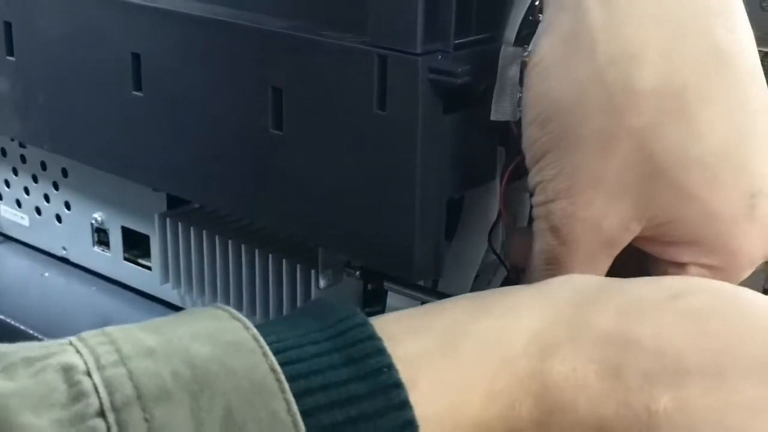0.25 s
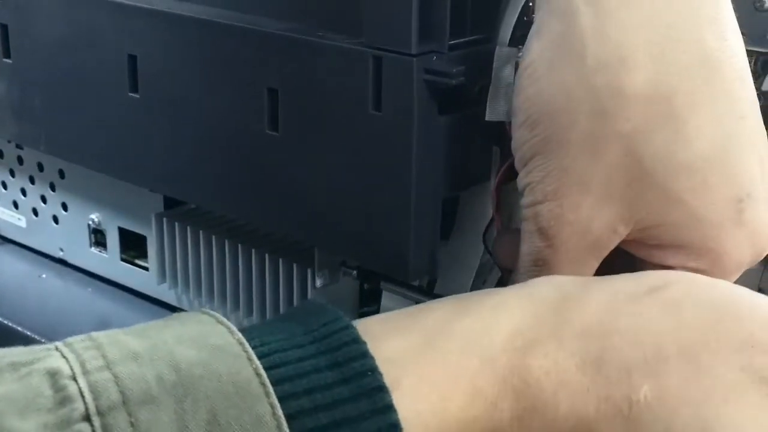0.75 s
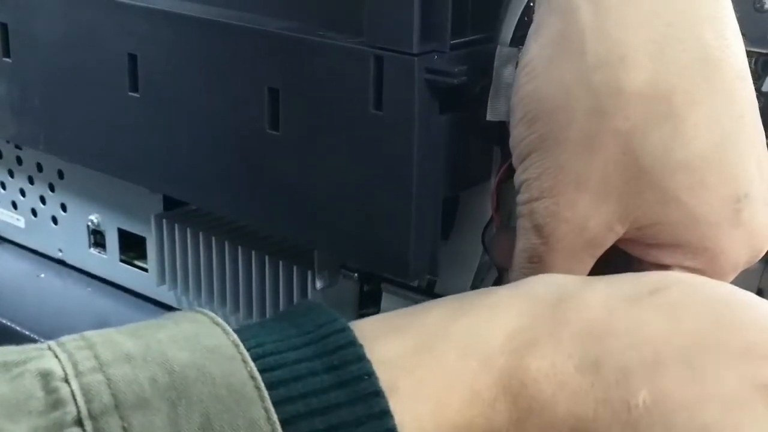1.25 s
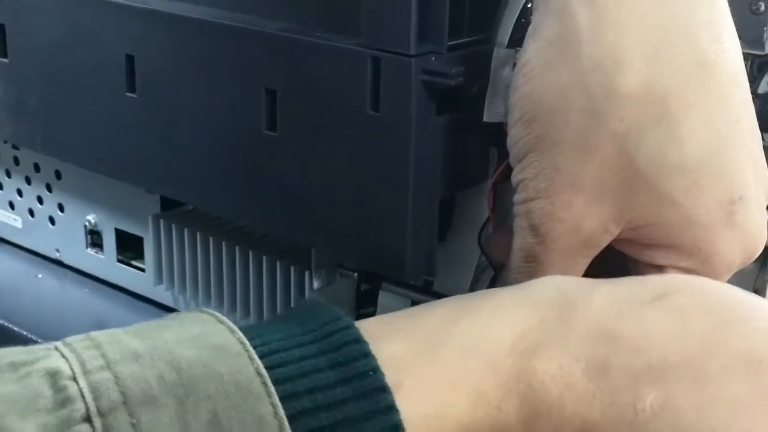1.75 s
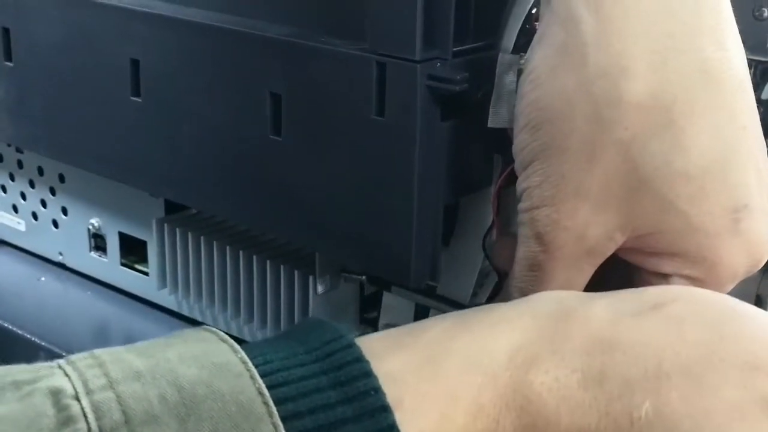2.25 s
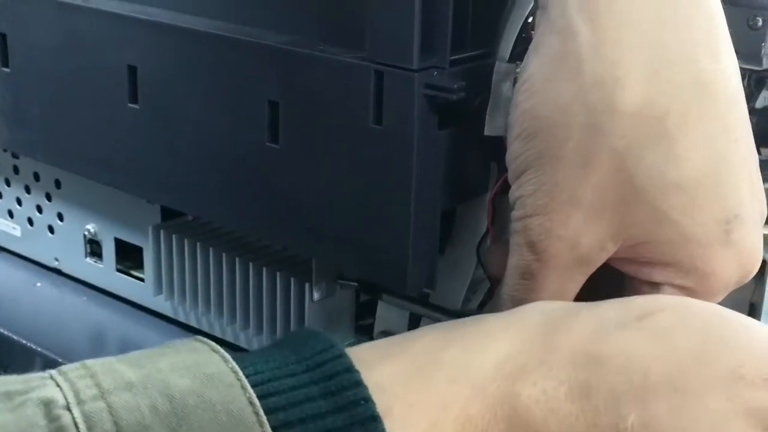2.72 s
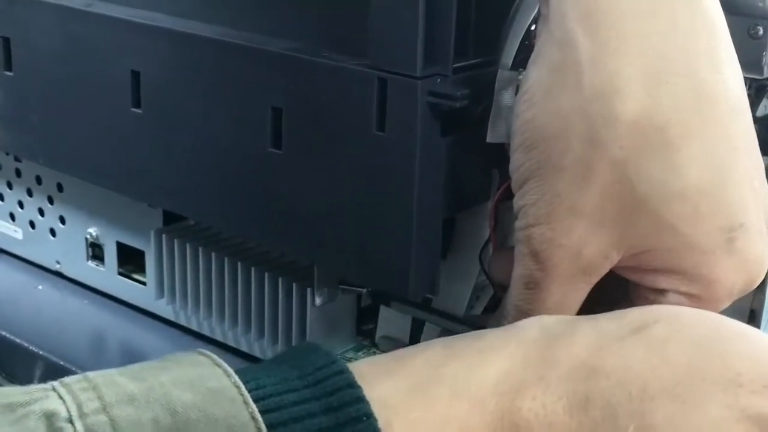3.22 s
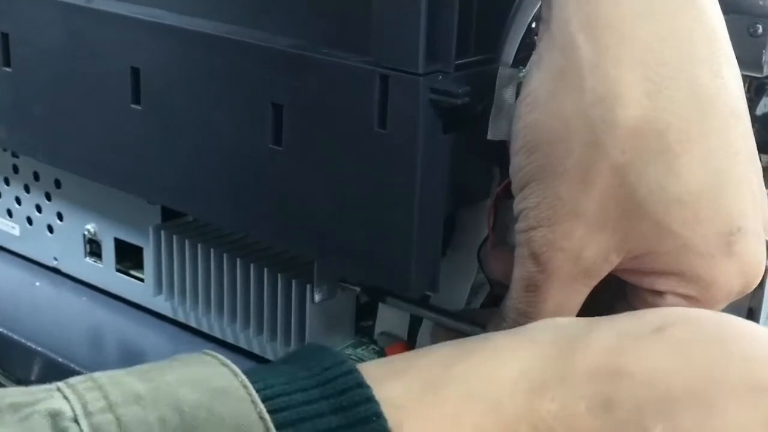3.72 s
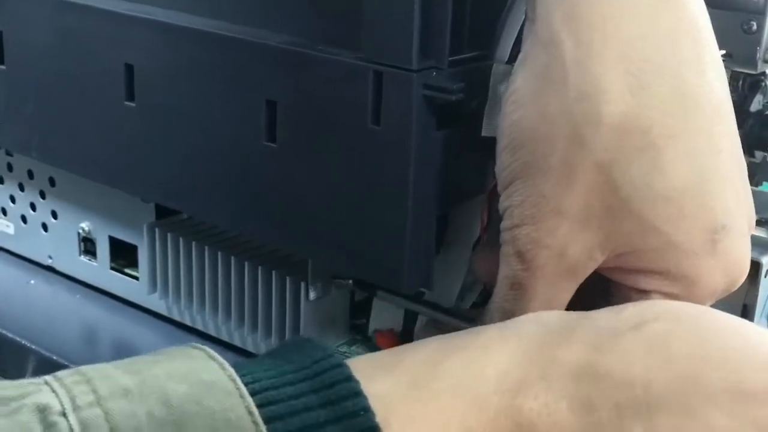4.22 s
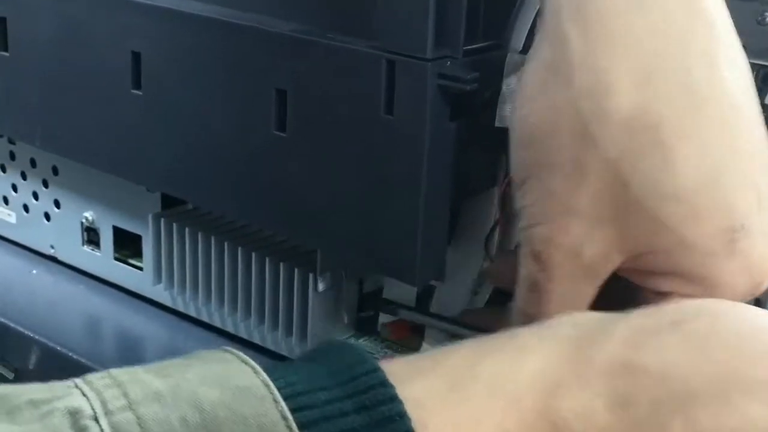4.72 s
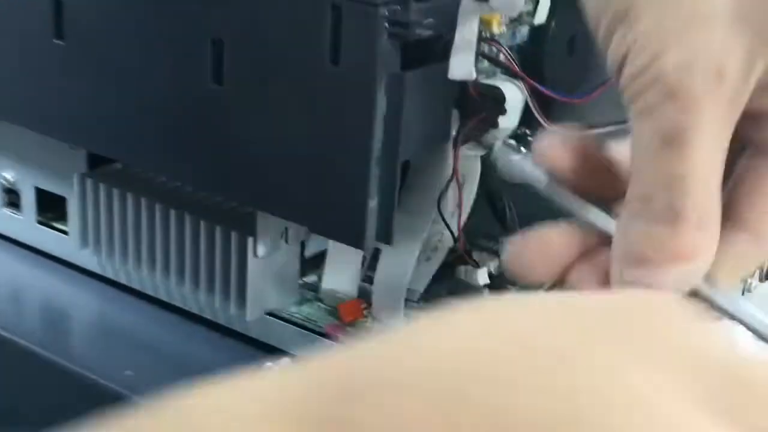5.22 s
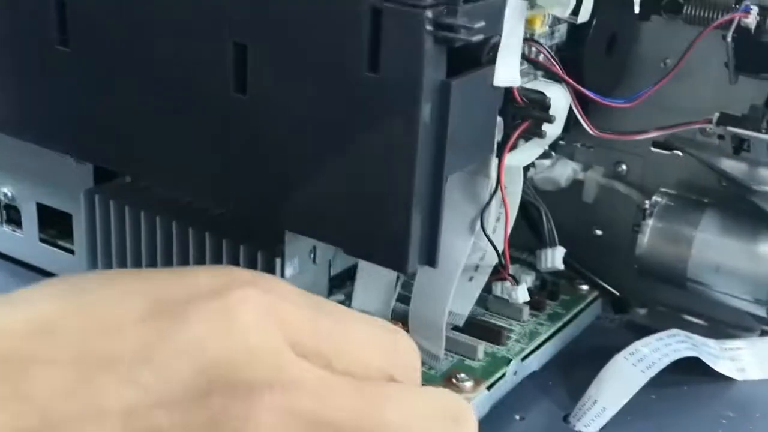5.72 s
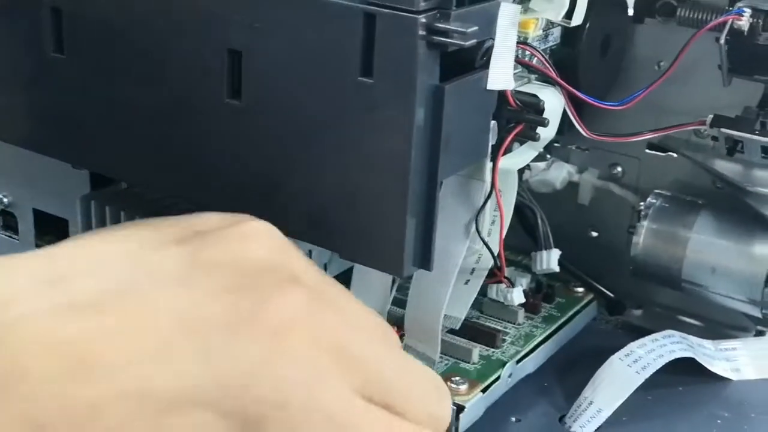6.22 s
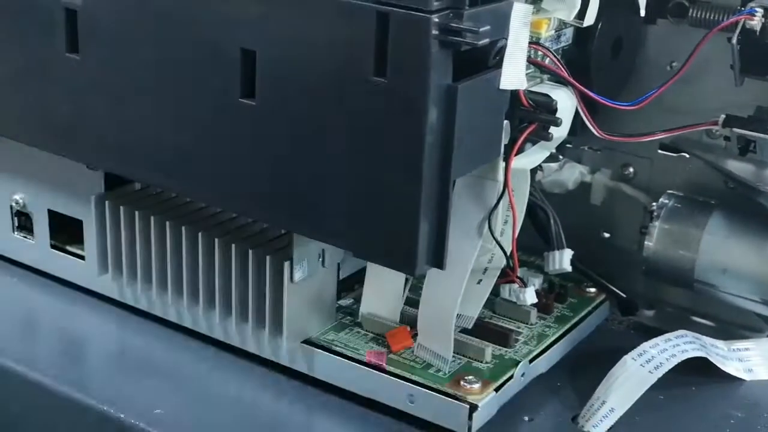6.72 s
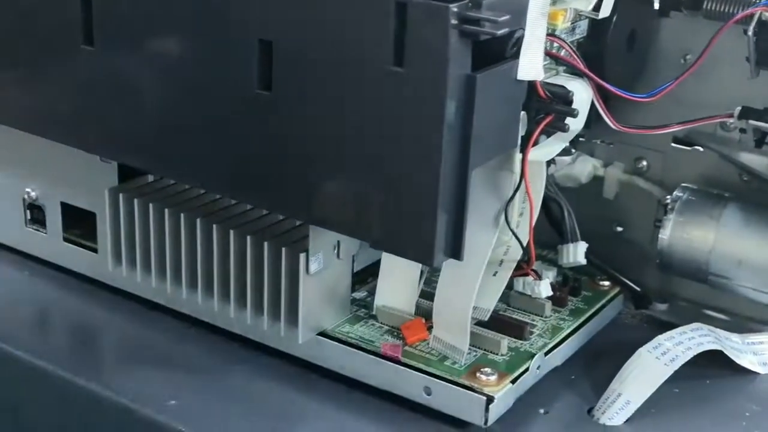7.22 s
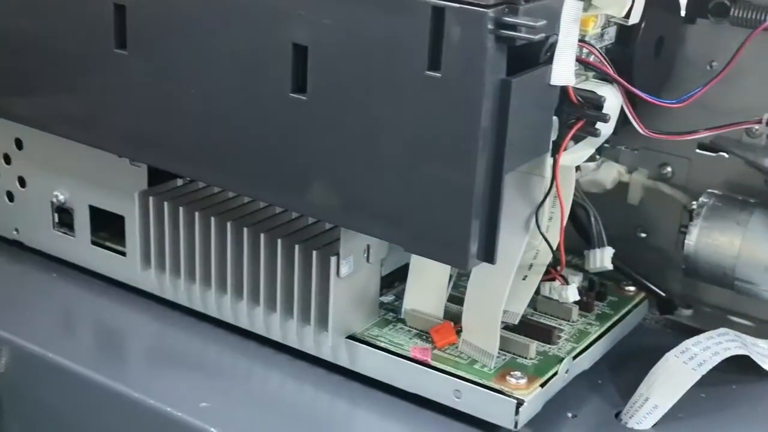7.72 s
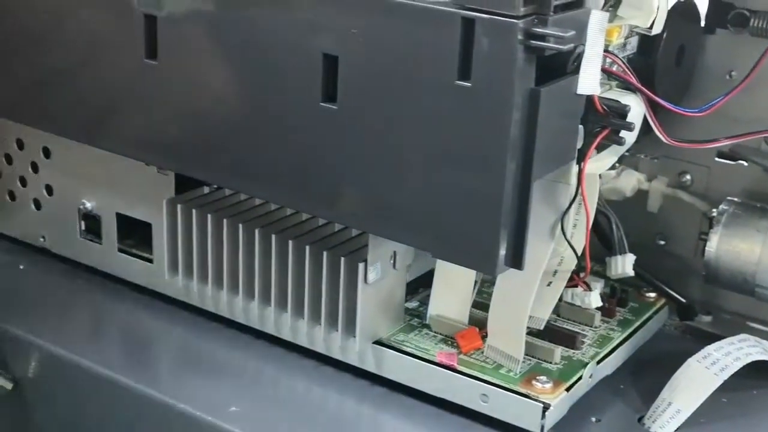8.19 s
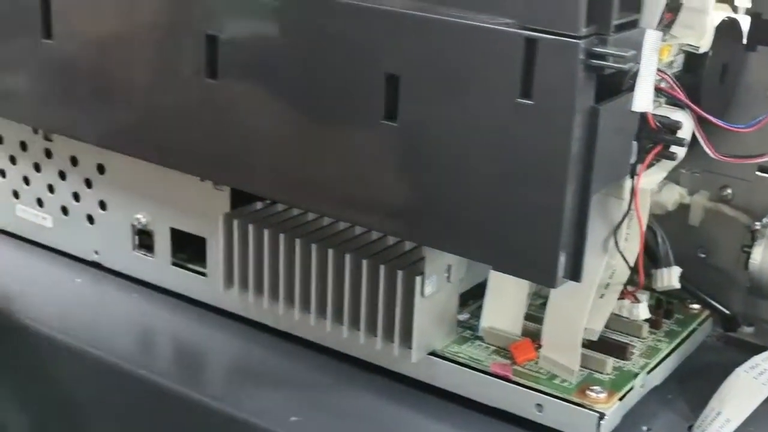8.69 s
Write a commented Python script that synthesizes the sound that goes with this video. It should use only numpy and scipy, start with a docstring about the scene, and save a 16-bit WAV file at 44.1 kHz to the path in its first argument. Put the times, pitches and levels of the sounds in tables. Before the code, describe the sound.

Light metal clicks and scrapes of a screwdriver inside an open printer, then a rattle and a ringing clang as it is put down.

```python
"""Light clicks and scrapes come first: a screwdriver works a screw out of an open printer, near a phone.
Each impact excites the modes of the steel chassis, and sliding friction drives them with tiny slips.
The bit rattles against the chassis as it is drawn out; then the tool is put down on a ringing sheet
with a clang, and a few knocks follow. The bench thuds and sleeves rustle, while faint hisses and
a brief whine sound over the quiet rumble of a small workshop."""
import sys
import numpy as np
from scipy import signal
from scipy.fft import rfft, irfft, next_fast_len
from scipy.io import wavfile

SR = 44100
rng = np.random.default_rng(int(sys.argv[2]) if len(sys.argv) > 2 else 0)


def generate_wav(signal):
    """Clip the signal to [-1, 1] and save it as 16-bit WAV at the path in sys.argv[1]."""
    frames = np.transpose(np.atleast_2d(signal))
    scaled = np.clip(frames, -1, 1) * 32767
    pcm = np.round(scaled).astype(np.int16)
    wavfile.write(sys.argv[1], SR, pcm)


N = 394694

# Levels are relative within each table; balance is left minus right. # metal striking the chassis, and from 8.3
# s the set-down tool knocking: start_s, level_db, knock_db, bright_db, panel_hz
IMPACTS = [(0.223, -54.5, 1.5, -20, 2100), (0.355, -49, -1, -18, 1600), (1.1095, -56, -1, -15, 1560),
           (1.6516, -60.5, -12, 2, 1870), (1.6822, -59, -26, -9, 2320), (1.708, -61, -14, 0.5, 2300),
           (1.7344, -55, -2, -4, 2580), (2.2418, -38, -7, -17, 1653), (2.3325, -50.5, -7, -13.5, 1640),
           (2.4548, -56.5, -6, 1, 2370), (2.5035, -49, -5.5, -13, 2580), (2.6774, -38.5, -11.5, -8, 2060),
           (2.7198, -42, -4.5, -21, 1745), (3.0605, -42, -23, -6.5, 2700), (3.22, -44, -11.5, -12.5, 2450),
           (3.4217, -55, -8, -2, 1690), (3.523, -44.5, -5.5, -13, 2620), (3.684, -34, -4.5, -3.5, 2750),
           (4.0964, -36, -6, -3, 2590), (4.129, -43.5, 2.5, -7, 2395), (4.303, -56.5, -9, 1, 2620),
           (4.363, -40.5, -4.5, -3.5, 1790), (4.384, -37.5, -2, -11.5, 2660),
           (4.7657, -32.5, -16, -16, 1867), (4.7872, -38.5, -20, -17.5, 2540),
           (4.8119, -40, -21.5, -5.5, 2400), (4.8458, -40.5, -8, -6.5, 2210), (4.921, -39, -22.5, -1, 2540),
           (4.9499, -22, -27, 0.5, 2700), (5.012, -27.5, -25.5, -4.5, 2860),
           (5.053, -26, -50.5, -2.5, 2700), (5.102, -18.5, -14.5, -1, 1870),
           (5.1485, -29.5, -14, 1.5, 1843), (5.176, -30, -26, -3.5, 2047), (5.2718, -22.5, -18, -4, 2655),
           (5.2839, -26.5, -0.5, -6, 2780), (5.37, -42, -13, -17, 2020), (5.4042, -41, -11, -10, 2050),
           (5.874, -50, -18, -7, 2650), (6.145, -42, -18, 0, 2290), (6.1541, -40, -12.5, -1.5, 2170),
           (7.428, -56, -4, -30, 2120), (7.7705, -42.5, -27, -12.5, 2470), (8.3473, -33, -9, -2, 2370),
           (8.4536, -33, -6, -29, 1680), (8.4843, -34, 3, -3.5, 1925), (8.603, -23, -15, -9.5, 1890),
           (8.6397, -32.5, -10, -25, 1700)]
# chassis and shaft resonances: pitch_hz, level_db
CHASSIS_MODES = [(830, -2), (1190, 2), (1600, -2), (1810, 2), (2280, 0.5), (2370, 3), (2530, 0.5),
                 (2650, 2), (2935, -1.5), (3900, 0.5), (4360, -2.5), (4635, -0.5), (5055, -15.5), (5870, 0),
                 (6440, -16), (6720, -13.5), (7480, 4.5), (7830, 2.5), (9640, 3.5)]
# spectrum of a contact: frequency_hz, density_db
CONTACT_SPECTRUM = [(100, -26), (300, -1), (520, -5), (800, 2), (1400, 2.5), (1800, -2.5), (2750, -4),
                    (3400, -1.5), (5500, -1.5), (7700, -3.5), (8700, -3.5), (10000, -4), (15000, -11.5)]
# leftward lean of a contact: frequency_hz, balance_db
CONTACT_BALANCE = [(300, 7), (1000, 7.5), (2500, -0.5), (4500, 5), (7500, 8.5), (13000, 7)]
# resonances of the sheet that the tool lands on: pitch_hz, level_db
SHEET_MODES = [(660, 4), (748, -6.5), (1061, 0), (1167, -28), (1260, -22), (1486, 13.5), (1566, -15),
               (1764, -19), (1810, -26), (2019, 10.5), (2165, -26), (2195, -14), (2506, 0), (2534, -11),
               (2592, -18), (2692, -5), (2879, -18), (2942, 12), (3246, -7), (3345, 0), (3670, -11)]
# broad spectrum of that sheet: frequency_hz, density_db
SHEET_SPECTRUM = [(100, -24), (200, -20), (350, -15.5), (480, -25), (650, -15), (900, -16.5), (1150, -12.5),
                  (1500, -7.5), (1850, -6.5), (2850, -3.5), (3300, -11), (5000, -26.5), (7800, -31),
                  (9500, -65)]
# its clusters of crowded modes: centre_hz, boost_db
SHEET_CLUSTERS = [(690, 4), (1160, 4.5), (1550, 4), (1810, 13), (2170, 14), (2580, 9), (2900, 9), (3250, 6),
                  (3640, 7.5)]
# its stereo image: frequency_hz, balance_db
SHEET_BALANCE = [(400, 4.5), (1800, -6.5), (7000, -5)]
# bit and fingers sliding: middle_s, sigma_s, level_db, bright_db, knock_db
STROKES = [(0.31, 0.053, -69, -23, 1.5), (0.74, 0.025, -65, -12.5, -4.5), (1.131, 0.033, -62.5, -17, -3),
           (1.493, 0.022, -68, -9, -8), (1.808, 0.045, -66.5, -7, -9.5), (2.161, 0.014, -62.5, -8, -15),
           (2.23, 0.014, -58.5, -7.5, -11), (3.052, 0.0082, -60, -9, -15), (3.499, 0.011, -59, -10, -19),
           (4.093, 0.0026, -55.5, -1, -12), (4.758, 0.0046, -53, -7, -9.5), (4.83, 0.046, -56.5, -10, -10),
           (4.986, 0.035, -49.5, -4, -17.5), (5.069, 0.027, -48, 0, -14), (5.169, 0.044, -50, 1, -7),
           (5.332, 0.047, -51.5, -9.5, -6.5), (5.898, 0.031, -62, -13, -13.5),
           (8.365, 0.011, -43, -7.5, -3), (8.451, 0.027, -51, -8.5, -0.5)]
# light touches that leave one steel part ringing: start_s, pitch_hz, level_db, t60_s
TOUCHES = [(2.679, 7700, -40, 0.024), (4.099, 4140, -33.5, 0.038), (4.846, 4115, -38.5, 0.044),
           (5.876, 4610, -66.5, 0.99), (6.153, 2895, -54.5, 0.5), (8.484, 5260, -21, 0.015),
           (8.604, 1777, -34, 0.31)]
# free vibration of the screwdriver's shaft: pitch_hz, level_db, t60_s
SHAFT_MODES = [(2535, -1, 0.3), (4530, -3.5, 0.25), (7040, 6, 0.065), (9560, -4.5, 0.086)]
# the shaft glancing off the chassis: start_s, level_db
SHAFT_GLANCES = [(4.9215, -39), (4.95, -35), (5.046, -33.5)]
# soft bumps on the bench: start_s, level_db, pitch_hz
BENCH_BUMPS = [(6.138, -45, 173), (7.594, -34.5, 206.5), (7.696, -45, 200), (8.449, -38.5, 207),
               (8.486, -44, 330), (8.531, -45, 218)]
# arms shifting on the bench: middle_s, sigma_s, level_db
ARM_MOVES = [(4.25, 0.3, -67), (5.11, 0.24, -56), (8.03, 0.051, -50), (8.456, 0.094, -52)]
# rustle of the sleeves: frequency_hz, density_db
SLEEVE_SPECTRUM = [(30, -30), (80, 5), (130, 1.5), (220, -1), (330, -12), (600, -21), (1500, -48.5)]
# swells of thin hiss: peak_s, fall_s, level_db
HISS_SWELLS = [(3.74, 0.14, -60), (6.599, 0.052, -53), (7.36, 0.032, -56.5)]
# their spectrum: frequency_hz, density_db
HISS_SPECTRUM = [(3000, -6.5), (4800, -5.0), (5500, -1.0), (5900, 2), (6800, -0.5), (7800, 0.5),
                 (9000, -25.5), (14000, -29)]
# reverberation of the workshop: frequency_hz, t60_s
ROOM_DECAY = [(200, 1), (800, 0.12), (2200, 0.42), (6000, 0.34), (14000, 0.13)]
# spectrum of the room noise: frequency_hz, density_db
NOISE_SPECTRUM = [(12, -32), (20, -6.5), (43, 2.5), (114, -5.5), (239, -14), (346, -21.5), (528, -26),
                  (785, -27), (872, -23.5), (1370, -26.5), (1730, -20.5), (3020, -25), (4480, -35.5),
                  (7400, -34.5), (11000, -60.5), (14300, -91), (22000, -120)]
# its slow drift: time_s, level_db
NOISE_LEVEL = [(0, -55.5), (3, -57.5), (4.5, -56.5), (8.95, -54.5)]
# its likeness at the two microphones: frequency_hz, coherence
NOISE_COHERENCE = [(60, 0.9), (150, 0.93), (380, 0.74), (950, 0.29), (2380, 0.15), (5980, 0.1964),
                   (15000, 0.05)]
# its rightward lean: frequency_hz, balance_db
NOISE_BALANCE = [(200, -0.5), (1200, -1), (2400, -11.5), (4400, -0.5), (8000, -3.5)]

CRACK_T60_S, RING_T60_S = 0.0078, 0.067
RING_AT_DB, RING_HALVING_DB = -38, 56  # harder contacts are pressed on longer and ring shorter
SOFT_HZ, HARD_HZ, HARD_ABOVE_DB = 4280, 7520, -3.5  # bright contacts favour the higher shaft resonance
FIZZ_DB, FIZZ_PER_BRIGHT = -12, 2.3  # the top octave grows faster than the treble as contacts harden
PAN_DB, PAN_PER_BRIGHT = -7, 0.12  # dull contacts lie further right
LANDING_S, LANDING_DB, STAGGER_S, LANDING_THUD_DB = 7.9483, -6.5, 0.003, -39
CHATTER_AFTER_S, CHATTER_GAP_S, CHATTER_DB, CHATTER_LOSS_DB = 0.032, 0.021, -12, 7
SLIPS_PER_S, SLIPS_AT_DB, DOUBLING_DB = 900, -61.5, 9  # firmer sliding slips more often
THUD_DB, THUD_PER_DB, THUD_PER_KNOCK = -32.5, 0.6, 0.066  # how hard an impact pushes the bench
BENCH_HZ, BENCH_SPREAD, BENCH_T60_S = 178.7, 0.15, 0.095  # the pitch varies with the spot pushed
SQUEAL_S, SQUEAL_FALL_S, SQUEAL_DB, SQUEAL_HZ = 3.6, 0.1, -63.5, 5970
WHINE_S, WHINE_HZ, WHINE_DB, WHINE_RISE_S, WHINE_T60_S = 6.925, 536, -63, 0.02, 0.82
WAVER_HZ, WAVERS_PER_S = 17, 9.1
NOISE_LAG_S = 0.000598  # the room noise reaches the left microphone later
BAND_LIMIT_HZ = 15700


def chassis_clicks():
    """Impact excitation: a crack, then ringing steel; the spot struck favours two resonances."""
    out, t = np.zeros((2, N)), np.arange(SR // 3) / SR
    spreading = 1 - np.exp(-t / 0.0024)
    for s, db, knock_db, bright_db, panel_hz in IMPACTS:
        shaft_hz = HARD_HZ if bright_db > HARD_ABOVE_DB else SOFT_HZ
        loading = 1 + 0.015 * rng.standard_normal()  # the tool's pressure detunes the steel a little
        modes = [(hz * loading, level) for hz, level in CHASSIS_MODES + [(panel_hz, -1), (shaft_hz, 0)]]
        t60 = RING_T60_S * 2 ** ((RING_AT_DB - db) / RING_HALVING_DB)
        steel = amp(-4.5) * ring(modes, t, 1.2 * t60, spread_db=3.5)
        crack = amp(7.0) * burst(t, CRACK_T60_S)
        hit = unit_energy((crack + burst(t, t60) + steel) * spreading)
        favoured = lambda hz: 5 * hump(hz, panel_hz, width=0.12) + 5 * hump(hz, shaft_hz, width=0.08)
        click = chassis_colour(coloured(hit, favoured), knock_db, bright_db)
        add(out, s - 0.0007, amp(db + 32) * in_room(click, wet_db=-11))
    return out


def chassis_colour(x, knock_db, bright_db):
    """Contact stiffness sets bandwidth: heavy contacts move the panels, hard ones reach the treble."""
    fizz_db = FIZZ_DB + FIZZ_PER_BRIGHT * bright_db
    pan_db = PAN_DB + PAN_PER_BRIGHT * bright_db
    hardness = [(1100, knock_db), (1700, 0.0017), (2900, 0.019),
                (3600, bright_db), (7900, bright_db), (9500, fizz_db)]
    balance = lambda hz: panned(pan_db + along(CONTACT_BALANCE, hz))
    return coloured(x, lambda hz: along(CONTACT_SPECTRUM, hz) + along(hardness, hz) + balance(hz))


def sheet_clang():
    """Plate vibration: the tool lands in quick blows on a sheet whose dense modes ring, then settle."""
    out, t = np.zeros((2, N)), np.arange(SR * 3 // 4) / SR
    clusters = lambda hz: sum(db * np.exp(-((hz - centre) / 90) ** 2) for centre, db in SHEET_CLUSTERS)
    sheet = lambda hz: along(SHEET_SPECTRUM, hz) + clusters(hz) + panned(along(SHEET_BALANCE, hz))
    for s, db in landing_blows():
        blow = coloured(burst(t, t60=0.0073), sheet)
        add(out, s, amp(db + 21) * in_room(blow, wet_db=-14))
    wash = amp(19.5) * coloured(burst(t, t60=1.0), sheet)
    partials = amp(-1.0 + panned(np.array([-7]))) * ring(SHEET_MODES, t, t60=0.47, spread_db=0.79)
    settling = 1 / (1 + (t / 0.35) ** 12)
    add(out, LANDING_S, settling * (wash + partials))
    return out


def landing_blows(count=3):
    """Inelastic rebound: the tool's parts land in turn, then chatter ever more weakly."""
    touch_down = [(LANDING_S + k * STAGGER_S, LANDING_DB) for k in range(count)]
    chatter = [(LANDING_S + CHATTER_AFTER_S + k * CHATTER_GAP_S, CHATTER_DB - k * CHATTER_LOSS_DB)
               for k in range(count)]
    return touch_down + chatter


def scrapes():
    """Stick-slip friction: a swell of tiny random slips excites the chassis, damped by the hand."""
    out, t = np.zeros((2, N)), np.arange(SR // 2) / SR
    lead_s, grain_t = 0.2, t[:SR // 16]
    for s, sigma_s, db, bright_db, knock_db in STROKES:
        rate = SLIPS_PER_S * 2 ** ((db - SLIPS_AT_DB) / DOUBLING_DB)
        slips = (rng.random(len(t)) < rate / SR) * rng.standard_normal(len(t))
        body = burst(grain_t, t60=0.034)
        body += amp(-5.5) * ring(CHASSIS_MODES, grain_t, t60=0.02, spread_db=2.3)
        grains = unit_rms(signal.fftconvolve(slips[None], body, axes=1)[:, :len(t)])
        stroke = chassis_colour(grains * bell(t - lead_s, sigma_s), knock_db, bright_db)
        add(out, s - lead_s, amp(db + 16.5) * in_room(stroke, wet_db=-10.5))
    return out


def steel_tings():
    """Free vibration: the shaft and small brackets, lightly touched, ring as damped sinusoids."""
    out, t = np.zeros((2, N)), np.arange(SR // 2) / SR
    shaft = [(s, hz, db + mode_db, t60) for s, db in SHAFT_GLANCES for hz, mode_db, t60 in SHAFT_MODES]
    mic_phase = np.array([[0], [1]])
    for s, hz, db, t60 in TOUCHES + shaft:
        tone = np.sin(2 * np.pi * hz * t + mic_phase) * fade(t, t60) * (1 - np.exp(-t / 0.00013))
        add(out, s, amp(db) * in_room(tone, wet_db=-25.5))
    return out


def bench_thuds():
    """Structure-borne sound: hands, the landing and each impact push the bench, heavy impacts more."""
    out = np.zeros((2, N))
    for s, db, hz in BENCH_BUMPS + [(LANDING_S, LANDING_THUD_DB, BENCH_HZ)]:
        add(out, s, thud(db, hz))
    for s, db, knock_db, _, _ in IMPACTS:
        hz = BENCH_HZ * np.exp(BENCH_SPREAD * rng.standard_normal())
        add(out, s, thud(THUD_DB + THUD_PER_DB * db + THUD_PER_KNOCK * knock_db, hz))
    return out


def thud(db, hz):
    """Damped oscillator: the bench answers a soft push with a few low cycles."""
    t = np.arange(SR // 4) / SR
    push = np.sin(2 * np.pi * hz * t) * fade(t, BENCH_T60_S) * (1 - np.exp(-t / 0.01))
    return amp(db + 4.5) * in_room(np.array([push, push]), wet_db=-20.0)


def sleeve_rustle():
    """Friction noise: arms and sleeves drag on the bench with a low rustle."""
    t = np.arange(N) / SR
    effort = sum(amp(db) * bell(t - s, sigma_s) for s, sigma_s, db in ARM_MOVES)
    return effort * unit_rms(coloured(rng.standard_normal(N), lambda hz: along(SLEEVE_SPECTRUM, hz)))


def hiss_and_squeal():
    """Band-limited noise: a hiss swells as the hands move; the screw thread adds a narrower squeal."""
    out, t = np.zeros((2, N)), np.arange(SR) / SR - 1 / 2
    broad = lambda hz: along(HISS_SPECTRUM, hz)
    narrow = lambda hz: 45 * hump(hz, SQUEAL_HZ, width=0.049)
    swells = [(*row, broad) for row in HISS_SWELLS]
    for s, fall_s, db, colour in swells + [(SQUEAL_S, SQUEAL_FALL_S, SQUEAL_DB, narrow)]:
        hiss = unit_rms(coloured(rng.standard_normal((2, SR)), colour))
        envelope = np.exp(-abs(t) / fall_s) * np.cos(np.pi * t)
        add(out, s + t[0], amp(db) * hiss * envelope)
    return out


def whine():
    """Frequency modulation: one faint tone wavers as it fades in the room."""
    out, t = np.zeros((2, N)), np.arange(SR) / SR
    hz = WHINE_HZ + WAVER_HZ * np.cos(2 * np.pi * WAVERS_PER_S * t)
    envelope = (1 - np.exp(-t / WHINE_RISE_S)) * fade(t, WHINE_T60_S)
    tone = np.sin(2 * np.pi * np.cumsum(hz) / SR) * envelope
    add(out, WHINE_S, amp(WHINE_DB) * in_room(np.array([tone, tone]), wet_db=-0.5))
    return out


def room_noise():
    """Partial coherence: rumble and hiss from the right, nearly mono in the bass, plus microphone noise."""
    level_db = np.interp(np.arange(N) / SR, *np.transpose(NOISE_LEVEL))
    size = 2 * next_fast_len(N // 2 + 1)
    hz = np.fft.rfftfreq(size, 1 / SR)
    angle = np.arccos(along(NOISE_COHERENCE, hz)) / 2
    spectra = rfft(rng.standard_normal((2, size))) * amp(along(NOISE_SPECTRUM, hz))
    mid, side = spectra * [np.cos(angle), np.sin(angle)]
    balance = amp(panned(along(NOISE_BALANCE, hz)))
    lag = np.exp(np.pi * hz * NOISE_LAG_S * np.array([[-1j], [1j]]))
    noise = unit_rms(irfft(np.array([mid + side, mid - side]) * balance * lag, size)[:, :N])
    return amp(level_db) * noise + amp(-82.0) * rng.standard_normal((2, N))


def in_room(x, wet_db):
    """Reverberation: x gains a fresh diffuse tail that builds up within milliseconds."""
    hz, t, noise = signal.stft(rng.standard_normal((2, SR // 2)), SR, nperseg=256)
    decay = amp(-60 * t / along(ROOM_DECAY, hz)[:, None])
    _, tail = signal.istft(noise * decay * (1 - np.exp(-t / 0.0041)), SR, nperseg=256)
    return x + amp(wet_db) * signal.fftconvolve(x, unit_energy(tail), axes=1)[:, :x.shape[-1]]


def ring(modes, t, t60, spread_db):
    """Modal superposition: each mode has a random strength and its own phase at each microphone."""
    draws = rng.standard_normal((len(modes), 3, 1))
    tones = sum(amp(db + spread_db * draw[0]) * np.sin(2 * np.pi * (hz * t + draw[1:]))
                for (hz, db), draw in zip(modes, draws))
    return unit_energy(tones * fade(t, t60))


def burst(t, t60):
    """Modal overlap: crowded modes merge into decaying noise of energy 1."""
    return unit_energy(rng.standard_normal((2, len(t))) * fade(t, t60))


def coloured(x, gain_db):
    """Minimum-phase filtering: folding the cepstrum makes the response gain_db(hz) causal."""
    size = 2 * next_fast_len(x.shape[-1] // 2 + 2048)
    cepstrum = irfft(np.log(amp(gain_db(np.fft.rfftfreq(size, 1 / SR)))), size)
    cepstrum[..., 1:size // 2] *= 2
    cepstrum[..., size // 2 + 1:] = 0
    return irfft(rfft(x, size) * np.exp(rfft(cepstrum)), size)[..., :x.shape[-1]]


def fade(t, t60):
    """Exponential decay, 60 dB in t60 seconds."""
    return np.exp(-np.log(1000) * t / t60)


def bell(offset, sigma):
    """Gaussian of height 1."""
    return np.exp(-(offset / sigma) ** 2 / 2)


def hump(hz, centre_hz, width):
    """Resonance peak: a bell on a log-frequency axis."""
    return bell(np.log((hz + 1) / centre_hz), width)


def along(points, hz):
    """Interpolation of (frequency_hz, value) points on a log axis."""
    knots_hz, values = np.transpose(points)
    return np.interp(np.log(hz + 1), np.log(knots_hz + 1), values)


def panned(db):
    """Level difference split into left and right offsets in dB."""
    return np.array([db, -db]) / 2


def amp(db):
    """Decibels to gain."""
    return 10 ** (np.asarray(db) / 20)


def unit_rms(x):
    """Normalisation to rms 1."""
    return x / np.sqrt(np.mean(x ** 2) + 1e-20)


def unit_energy(x):
    """Normalisation of each channel to energy 1."""
    return x / np.linalg.norm(x, axis=-1, keepdims=True)


def add(out, s, x):
    """Superposition of x onto out from time s."""
    start = round(s * SR)
    x = x[..., max(-start, 0):max(N - start, 0)]
    out[:, max(start, 0):][:, :x.shape[-1]] += x


def scene():
    """Linear superposition: the pressures of all sources add at the two microphones."""
    metal = chassis_clicks() + steel_tings() + scrapes() + sheet_clang()
    return metal + bench_thuds() + sleeve_rustle() + hiss_and_squeal() + whine() + room_noise()


def record(dry):
    """Long waves reach the close microphones alike; the phone clips and limits the bandwidth."""
    size = next_fast_len(N + SR // 2)
    hz = np.fft.rfftfreq(size, 1 / SR)
    left, right = rfft(np.clip(dry, -1, 1), size) * (hz < BAND_LIMIT_HZ)
    mid = (left + right) / 2
    side = (left - right) / 2 * hz / np.hypot(hz, 280)  # the image narrows below 280 Hz
    return irfft(np.array([mid + side, mid - side]), size)[:, :N]


dry = scene()
out = record(dry)
generate_wav(out)
```